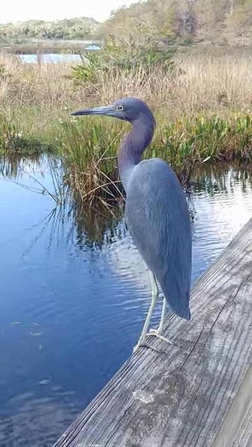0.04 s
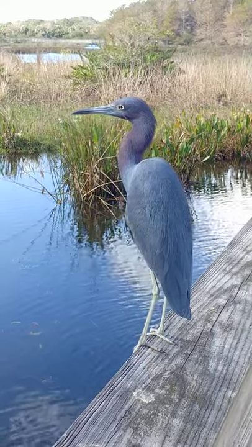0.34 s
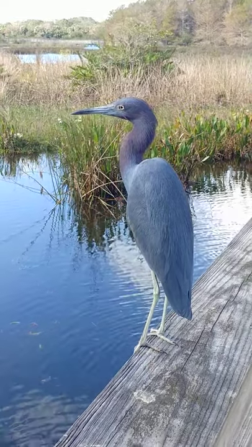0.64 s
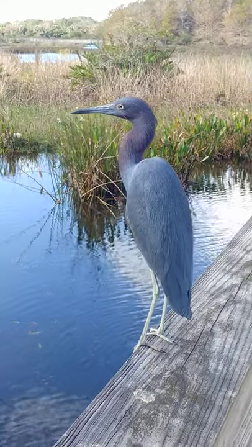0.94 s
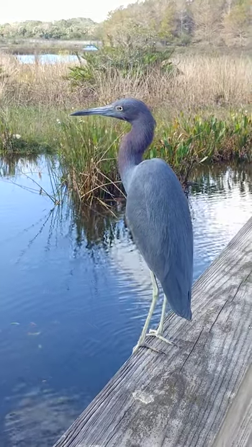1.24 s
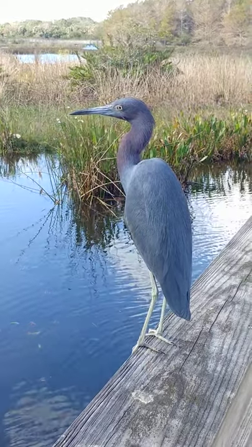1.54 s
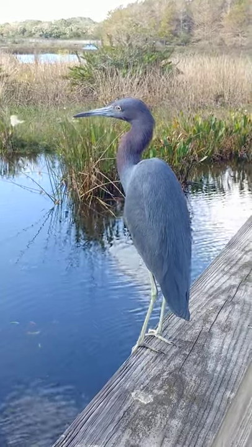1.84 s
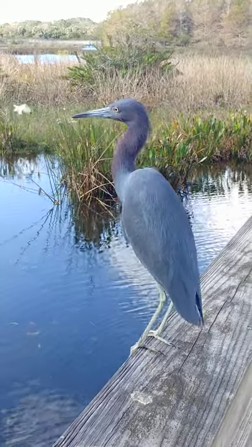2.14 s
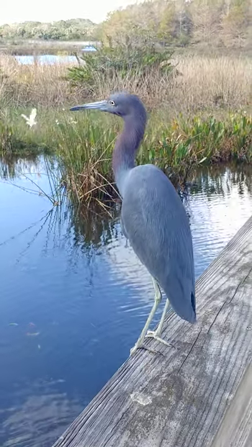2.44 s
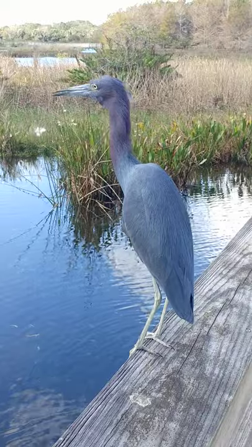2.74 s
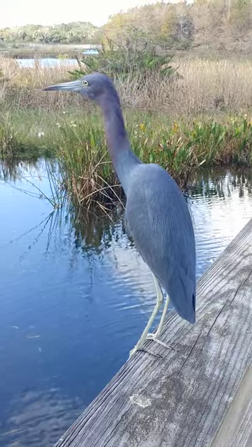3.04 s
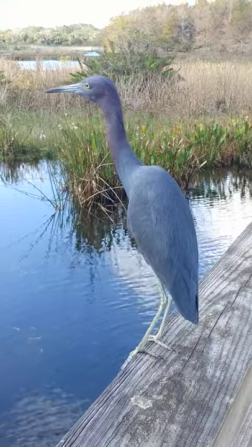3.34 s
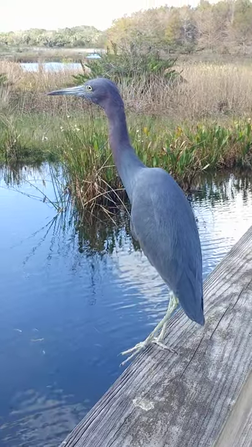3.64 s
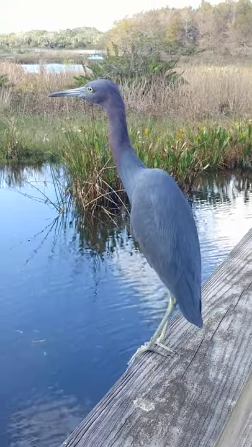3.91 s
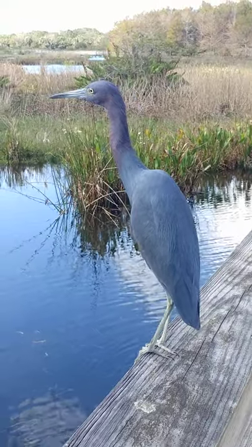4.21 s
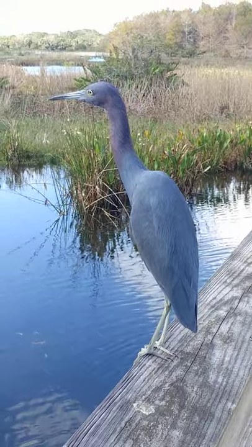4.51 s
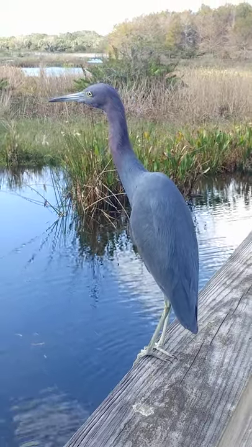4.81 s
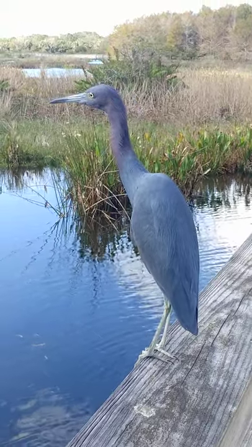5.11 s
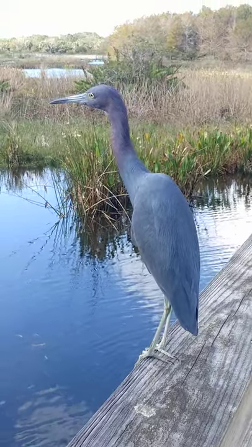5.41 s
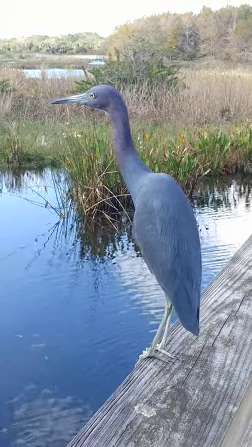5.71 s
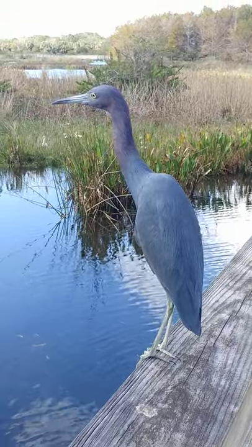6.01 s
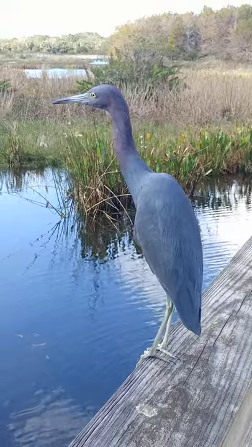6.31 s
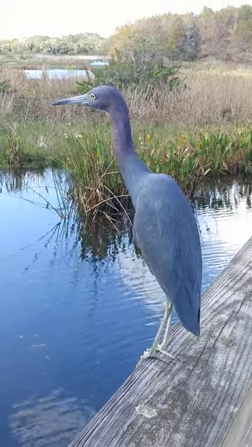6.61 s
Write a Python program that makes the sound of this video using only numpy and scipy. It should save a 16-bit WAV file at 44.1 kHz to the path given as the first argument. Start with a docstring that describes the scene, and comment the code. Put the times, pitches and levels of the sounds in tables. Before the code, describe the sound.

A soft outdoor hush lies over a marsh pond, with one faint, distant water bird hoot at about 0.3 seconds. From 0.7 seconds, low gusts buffet the microphone, shifting between left and right and thumping hardest around 1.4 to 1.7 seconds. Near 1.9 seconds there is a brief, dry, crackly scuff close on the right, followed by a few faint ticks. At about 2.8 seconds a harsh, bird-like squawk starts close on the same side, a quick rasping rattle that runs into a short falling squeal and ends by 3.1 seconds. A small croak follows at 3.4 seconds, among a few very faint, far hoots. The wind picks up again from about 3.8 seconds and keeps rumbling and fluttering unevenly, with stronger gusts near 5.1 and 6 seconds, easing towards the end.

```python
"""A soft outdoor hush and a far hoot, then gusts buffeting both microphone ports, on a boardwalk over a
marsh pond. Close to the right port something rubs, probably the grip on the casing: a brush, a crackly
scuff, then a harsh squawk in which stick-slip jerks run together into a short falling squeal, and one
last small croak. A few more hoots of water birds carry across the marsh, and the gusts go on."""
import sys
import numpy as np
from scipy import signal
from scipy.fft import rfft, irfft, next_fast_len
from scipy.io import wavfile

SR = 44100
rng = np.random.default_rng(int(sys.argv[2]) if len(sys.argv) > 2 else 0)


def to_wav(sig):
    """Store sig (one row per channel, or 1-D mono) as 16-bit WAV at the path in sys.argv[1].

    Samples outside -1..1 are clipped; the rate is SR.
    """
    pcm = np.clip(np.atleast_2d(sig), -1, 1) * 32767
    pcm = np.round(pcm).astype(np.int16)
    wavfile.write(sys.argv[1], SR, pcm.T)  # frames by channels


N = 298116
TIME = np.arange(N) / SR
SLOW_TIME = TIME[::20]

# colour of friction heard through the casing: f/Hz, relative level/dB
RASP_COLOUR = [(200, -2.5), (500, 8.5), (1000, 4), (2200, 17), (2650, 7), (2900, -3.5), (3400, 3.5),
               (4250, 8), (5000, 1), (5400, 5), (6300, -5), (7500, 0), (9600, -13.5), (10100, -33)]


def wind():
    """Wind on the microphone: the hardest gusts are rounded off; eddies smaller than a port cancel."""
    overload, port_hz = .9, 713
    pressure = breeze() + buffets()
    return low_pass(overload * np.tanh(pressure / overload), port_hz)


def breeze():
    """The same gusts pass both ports, each with its own strength at either one."""
    # gusts: t/s, rise/s, fall/s, left level/dB, right level/dB, extra flutter/dB
    gusts = [(0.62, 0.094, 0.4, -37, -36.5, -3), (0.768, 0.031, 0.098, -5.5, -20, -2),
             (1.268, 0.021, 0.023, -37, -20, 17.5), (1.31, 0.16, 0.18, -14, -20, 8),
             (1.424, 0.072, 0.044, -27.5, -6, 0), (1.498, 0.02, 0.083, -4.5, -6, 2),
             (1.6, 0.059, 0.037, -15.5, -2, -4), (1.653, 0.043, 0.06, -14.5, -7, 5.5),
             (1.925, 0.12, 0.12, -18, -15, 2), (2.085, 0.023, 0.0083, -20.5, -16.5, 4),
             (2.196, 0.075, 0.12, -17, -14, -0.5), (2.382, 0.039, 0.035, -23, -10, -8.5),
             (2.643, 0.55, 0.031, -26, -31.5, 2.5), (2.812, 0.11, 0.05, -20, -28, -7),
             (3.415, 0.27, 0.017, -50, -27.5, -12), (3.559, 0.035, 0.014, -42, -28.5, -16),
             (3.803, 0.054, 0.046, -16, -21.5, -7.5), (3.981, 0.064, 0.071, -16.5, -15.5, 3),
             (4.033, 0.035, 0.037, -20, -16, 15), (4.165, 0.075, 0.031, -18, -14.5, 9.5),
             (4.315, 0.015, 0.05, -12, -20, -15), (4.479, 0.13, 0.086, -35.5, -19, 6.5),
             (4.74, 0.42, 0.22, -36, -33, -15), (4.947, 0.074, 0.049, -16.5, -31, 6),
             (5.108, 0.079, 0.056, -10.5, -11.5, -0.5), (5.266, 0.11, 0.18, -20.5, -37, 4.5),
             (5.52, 0.084, 0.11, -45, -19.5, -10), (5.668, 0.093, 0.074, -19, -20.5, 5.5),
             (5.856, 0.067, 0.077, -17, -22, 4), (6.039, 0.12, 0.081, -20, -8.5, -3.5),
             (6.14, 0.034, 0.02, -20, -36, 4), (6.34, 0.14, 0.091, -21.5, -17, -4),
             (6.66, 0.13, 0.068, -29, -37, 3)]
    times, rise_s, fall_s, left_db, right_db, extra_db = np.transpose(gusts)
    shape_db = swells(times, rise_s, fall_s, shape=1.24)
    left = turbulence(shape_db + left_db[:, None], extra_db[:, None] - 15.5, calm_db=-48,
                      calm_flutter_db=-76.5, gain_db=-8.5, lumps_db=4.5, brightening=0.13)
    right = turbulence(shape_db + right_db[:, None], extra_db[:, None] - 9.5, calm_db=-41.5,
                       calm_flutter_db=-48, gain_db=-7, lumps_db=5.5, brightening=0.036)
    return np.array([left, right])


def turbulence(gusts_db, eddies_db, calm_db, calm_flutter_db, gain_db, lumps_db, brightening):
    """Eddies at one port: rumble below, lumpy flutter above that grows faster and brightens in gusts."""
    # colour of the wind: f/Hz, relative level/dB
    wind_colour = [(16, -5.5), (30, -16), (55, -20), (100, -22.5), (180, -20), (300, -29.5), (450, -43),
                   (700, -55.5), (1100, -45.5), (2000, -73)]
    flutter_growth = 1.524   # dB of flutter for each dB of rumble
    rumble_db = summed_db(gusts_db, calm_db)
    flutter_db = summed_db(flutter_growth * gusts_db + eddies_db, calm_flutter_db)
    gusty = 1 - 0.7 * from_db(calm_flutter_db - flutter_db)   # calm air is smoother
    lumps, out = drift(23), 0
    for hz, band in bands(18, 1600, count=12):
        small = np.clip(np.log2(hz / 75) / 1.586, 0, 1)   # share of small eddies
        reach_db = brightening * max(np.log2(hz / 220), 0) * (flutter_db + 30)
        band_db = (1 - small) * rumble_db + small * (flutter_db + lumps_db * gusty * lumps) + reach_db
        steady = evened(band, span_s=0.077) * band.std()
        out += from_db(at_hz(wind_colour, hz) + band_db) * steady
    return from_db(gain_db) * out


def buffets():
    """Single eddies hit a port: a push and a pull of pressure."""
    # the hardest eddies: t/s, side (-1 left, 1 right), peak level/dB, width/ms
    eddies = [(0.76, -1, -24, 0.3), (1.2629, 1, -22, 0.62), (1.403, 1, -8, 2.2), (1.488, 1, -17.5, 1.36),
              (1.611, 1, -5, 1.3), (1.663, 1, -5.5, 4.1), (4.1025, 1, -23.5, 0.68), (4.144, 1, -23, 0.58),
              (4.1711, 1, -24, 0.45), (6.0306, 1, -11, 2.9)]
    out = np.zeros((2, N))
    for s, side, peak_db, width_ms in eddies:
        near = around(s)
        age = (TIME[near] - s) / (width_ms / 1000)
        push_pull = 2 * np.tanh(age) / np.cosh(age)
        out[int(side > 0), near] += rng.choice([-1, 1]) * from_db(peak_db) * push_pull
    return out


def squawk():
    """Stick-slip on the casing, right at the microphone: jerks, a two-voiced squeal, a last croak."""
    # the squeal's two vibrations: t/s, f/Hz, level/dB, roughness (0 = smooth)
    high_voice = [(2.93, 1780, -44, 0.8), (2.965, 1836, -41, 1.2), (2.973, 1803, -46, 0.7),
                  (2.977, 1825, -31.5, 0), (2.989, 1840, -34.5, 0.48), (3.003, 1900, -35, 0.33),
                  (3.02, 1896, -41, 0.47), (3.038, 1790, -47, .6), (3.047, 1730, -69, .4)]
    low_voice = [(2.93, 1340, -63, 1), (2.942, 1350, -50, 0.48), (2.985, 1433, -47.5, 0.41),
                 (3.015, 1356, -54, 0.78), (3.035, 1370, -46, 0.23), (3.053, 1320, -42.5, 0.15),
                 (3.072, 1250, -50.5, 0.4), (3.08, 1235, -57, 0.24)]
    # their harmonics: multiple of the pitch, relative level/dB
    high_harmonics = [(1, 0.5), (2, -21.5)]
    low_harmonics = [(1, 2.5), (2, -12), (3, -20), (4, -20), (5, -46)]
    return (jerks()
            + squeal(high_voice, high_harmonics, jitter=0.066, growl=0.48, rasp_db=-7)
            + squeal(low_voice, low_harmonics, jitter=0.058, growl=0.94, rasp_db=-13))


def jerks():
    """Each slip swings the casing for a few cycles, throws off a spurt of rasp, then drags a little."""
    # runs of jerks: t/s, rate/Hz, peak level/dB, rasp relative to the peak/dB
    rattle = [(2.752, 70, -45, -13), (2.766, 70, -35, -13), (2.803, 66, -34, -7), (2.823, 82, -23, -7),
              (2.858, 83, -20.5, -6), (2.873, 83, -27, -7), (2.88, 83, -31, -8)]
    run_up = [(2.923, 130, -37, -11), (2.936, 130, -29, -15), (2.955, 110, -30.5, -13),
              (2.974, 110, -34, -13)]
    croak = [(3.349, 85, -47, -10), (3.361, 80, -38, -14), (3.374, 82, -41, -11), (3.386, 82, -32, -11),
             (3.392, 82, -42, -11)]
    # resonances of the casing: f/Hz, share by which the pitch wavers, relative level/dB
    casing = [(1336, 0.0518, -10), (1662, 0.061, -2.5), (1900, 0.059, -28)]
    times, peak_db, rasp_db = np.hstack([slips(run) for run in (rattle, run_up, croak)])
    swing = rms_one(sum(from_db(db) * np.sin(shaky_phase(hz, waver)) for hz, waver, db in casing))
    ring = swing * bursts(times, peak_db, rise_s=.002, fall_s=.0022)
    ring = signal.sosfilt(signal.butter(2, [1150, 2400], "band", fs=SR, output="sos"), ring)
    spurt = bursts(times, peak_db + rasp_db - 0.5, rise_s=.0011, fall_s=.0018)
    drag = bursts(times, peak_db + rasp_db - 14.5, rise_s=0.011, fall_s=0.018)
    hard = np.clip(spurt / from_db(-50), 0, 1)   # hard slips keep all their treble
    return ring + friction(spurt * hard, RASP_COLOUR) + soft_rasp(spurt * (1 - hard) + drag)


def slips(run):
    """Slightly uneven jerks, each with a weaker rebound: t/s, peak level/dB, relative rasp/dB."""
    jitter_s, spread_db = 0.00039, 1.5
    rebound_s, rebound_loss_db = 0.0052, 6.5
    rate_hz, level_db, rasp_db = in_time(run)
    count = np.ceil(np.cumsum(rate_hz * sounding(run)) / SR)
    onsets = TIME[np.diff(count, prepend=0) > 0]
    chance = rng.standard_normal((len(onsets), 4))
    times = np.r_[onsets, onsets + rebound_s] + jitter_s * chance[:, :2].T.ravel()
    change_db = spread_db * chance[:, 2:].T.ravel() - np.repeat([0, rebound_loss_db], len(onsets))
    return times, np.interp(times, TIME, level_db) + change_db, np.interp(times, TIME, rasp_db)


def squeal(curve, harmonics, jitter, growl, rasp_db):
    """Slips lock into a tone; while it is hoarse its pitch shakes and every fourth cycle is stronger."""
    hz, level_db, rough = in_time(curve)
    phase = shaky_phase(hz, jitter * rough)
    edge = np.clip(from_db(level_db + 45.5), 0, 1)   # overtones fade before the fundamental
    tone = np.sqrt(2) * sum(from_db(db) * edge ** (k > 1) * np.sin(k * phase) for k, db in harmonics)
    uneven = np.cos(phase / 4) + .7 * drift(300)
    level = sounding(curve) * from_db(level_db)
    rasp = soft_rasp(level * from_db(rasp_db) * rough * (1 + np.cos(phase)))
    return level * tone * (1 + growl * rough * uneven) + rasp


def scuff():
    """Grainy strokes of dry rubbing beside the port, with a few sharp snags."""
    # strokes: t/s, rise/s, fall/s, peak level/dB
    strokes = [(1.27, 0.021, .05, -58), (1.775, 0.019, .03, -66), (1.909, 0.011, 0.026, -41),
               (1.943, 0.029, 0.023, -40.5), (1.975, 0.037, .045, -59), (2.051, 0.004, .007, -58.5),
               (2.17, .1, .1, -71.5), (2.346, .006, .015, -66), (2.466, .003, .009, -61.5)]
    # snags: t/s, relative peak level/dB
    snags = [(1.9073, -37), (1.9183, -42), (1.9342, -33), (1.9384, -25), (1.9439, -29), (1.954, -41)]
    # colour of the rubbing: f/Hz, relative level/dB
    rub_colour = [(400, -5.5), (700, 5), (1500, 3), (2300, 9), (2900, -1), (3600, 10.5), (4600, 5),
                  (5600, 3), (6800, 10), (7900, 4.5), (9300, 2.5), (10800, -20.5), (13500, -10),
                  (15500, -30)]
    times, rise_s, fall_s, stroke_db = np.transpose(strokes)
    level_db = summed_db(swells(times, rise_s, fall_s, shape=1.3) + stroke_db[:, None], floor_db=-100)
    grainy = from_db(level_db + 2.5 * drift(200))
    snag_times, snag_db = np.transpose(snags)
    catches = bursts(snag_times, snag_db - 2.5, rise_s=0.0004, fall_s=0.00069)
    return friction(grainy + catches, rub_colour)


def friction(strength, spectrum):
    """Tiny impacts of the given strength, coloured by the casing they pass through."""
    impacts = rng.choice([-1., 1.], N)
    return shaped(strength * impacts, spectrum) / shaped(impacts, spectrum).std()


def soft_rasp(strength):
    """Gentle slips make a duller rasp."""
    return low_pass(friction(strength, RASP_COLOUR), hz=6200)


def hoots():
    """Water birds far across the marsh: soft, nearly pure calls that glide a little."""
    # calls: t/s, length/s, start f/Hz, end f/Hz, level/dB
    calls = [(0.333, 0.14, 630, 574, -53.5), (3.215, 0.095, 574, 595, -50.5), (3.34, 0.044, 500, 496, -54),
             (3.412, 0.041, 600, 580, -51)]
    out, unsteady = np.zeros(N), 1 + 0.0069 * drift(40)
    for s, length_s, start_hz, end_hz, db in calls:
        along = np.clip((TIME - s) / length_s, 0, 1)
        hz = (start_hz + (end_hz - start_hz) * along) * unsteady
        out += from_db(db) * np.sin(np.pi * along) * np.sin(2 * np.pi * np.cumsum(hz) / SR)
    return out


def hush():
    """Marsh ambience: distant noise at both ports, rustling reeds and a faint far drone on the right."""
    # colours of the hush at each port, the reeds and the drone: f/Hz, relative level/dB
    left_colour = [(60, -63), (150, -94), (300, -99), (600, -106), (1200, -113), (3000, -116), (7000, -118),
                   (10500, -120), (15000, -117.5)]
    right_colour = [(100, -67), (220, -107.5), (340, -84.5), (470, -86), (900, -85.5), (1400, -91),
                    (1900, -98), (2600, -110), (3300, -110), (3750, -104), (4600, -109), (7500, -111),
                    (10500, -121), (14000, -116)]
    reeds_colour = [(700, -105), (1500, -94), (1900, -99), (2700, -115), (3900, -105), (5500, -108),
                    (8000, -110), (10000, -124), (15000, -130)]
    drone_colour = [(280, -27.5), (320, -7), (343, -3.5), (380, -18.5), (600, -73.5)]
    # slow rise and fall of the right-hand hush, the reeds and the drone: t/s, level/dB
    swell = [(0, 1.5), (.3, -0.5), (1.2, -1.5), (3, -2.5), (3.6, .5), (4.6, 0.5), (5.6, -2.5), (5.9, 1.5),
             (6.76, -2)]
    reeds = [(0, -23), (1.2, -5), (2.2, -1.5), (3.2, -4.5), (4, -7.5), (4.8, -1), (5.6, -1), (6.2, -15.5),
             (6.76, -3.5)]
    drone = [(0, -57), (.9, -62), (1.5, -79.5), (5.6, -81.5), (6.2, -63), (6.76, -55.5)]
    (swell_db,), (reeds_db,), (drone_db,) = in_time(swell), in_time(reeds), in_time(drone)
    right = coloured(right_colour) * from_db(swell_db + .5 * drift(1.7))
    right += from_db(reeds_db) * coloured(reeds_colour)
    right += from_db(drone_db) * rms_one(coloured(drone_colour))
    return np.array([coloured(left_colour), right])


def on_right(x, left_db):
    """A sound at the right port, of which little reaches the left."""
    return np.array([from_db(left_db) * x, x])


def from_db(db):
    """Decibels to gain."""
    return 10 ** (np.asarray(db) / 20)


def rms_one(x):
    """Scale to unit power."""
    return x / np.sqrt(np.mean(x ** 2) + 1e-20)


def in_time(rows):
    """Each column of a curve at every sample."""
    times, *columns = np.transpose(rows)
    return [np.interp(TIME, times, column) for column in columns]


def sounding(rows):
    """1 between a curve's first and last point, else 0."""
    return (TIME > rows[0][0]) & (TIME < rows[-1][0])


def around(s):
    """The samples within 50 ms of a moment."""
    return slice(int(s * SR) - SR // 20, int(s * SR) + SR // 20)


def bursts(times, peaks_db, rise_s, fall_s):
    """Envelope of short bursts that swell to their peak and die away."""
    power = np.zeros(N)
    for s, peak_db in zip(times, peaks_db):
        near = around(s)
        age = TIME[near] - s
        power[near] += (from_db(peak_db) * np.exp(np.minimum(age / rise_s, -age / fall_s))) ** 2
    return np.sqrt(power)


def swells(times, rises_s, falls_s, shape):
    """One row of dB below the peak for each swell; shape 1 is pointed, 2 is bell-shaped."""
    age = SLOW_TIME - times[:, None]
    from_peak = np.maximum(-age / rises_s[:, None], age / falls_s[:, None])
    return -20 / np.log(10) * from_peak.clip(0, 20) ** shape


def summed_db(rows_db, floor_db):
    """Level of several swells together, over a floor, at every sample."""
    power = np.sum(from_db(np.maximum(rows_db, -200)) ** 2, axis=0) + from_db(floor_db) ** 2
    return np.interp(TIME, SLOW_TIME, 10 * np.log10(power))


def drift(rate_hz):
    """Smooth random wander with spread 1."""
    hop, settle = 40, 2000
    pole = np.exp(-2 * np.pi * rate_hz * hop / SR)
    white = rng.standard_normal(N // hop + settle + 2)
    slow = signal.lfilter([1], [1, -2 * pole, pole * pole], white)[settle:]
    return np.interp(np.arange(N) / hop, np.arange(len(slow)), rms_one(slow))


def shaky_phase(hz, waver):
    """Phase of a vibration whose pitch shakes by the given share."""
    return 2 * np.pi * np.cumsum(hz * (1 + waver * drift(204))) / SR


def at_hz(spectrum, hz):
    """Read a spectrum on a log-frequency axis."""
    points_hz, points_db = np.transpose(spectrum)
    return np.interp(np.log(hz), np.log(points_hz), points_db)


def shaped(x, spectrum):
    """Give a sound the colour of a spectrum, falling away below its first point."""
    size = next_fast_len(N, True)
    hz = np.maximum(np.arange(size // 2 + 1) * SR / size, 1)
    gain = from_db(at_hz(spectrum, hz)) * np.minimum(hz / spectrum[0][0], 1) ** 2
    return irfft(rfft(x, size) * gain, size)[:N]


def coloured(spectrum):
    """Steady noise with the given dB per Hz."""
    return shaped(rng.standard_normal(N), spectrum) * np.sqrt(SR / 2)


def bands(low_hz, high_hz, count):
    """Split a white noise of unit power per Hz into overlapping bands: centre f/Hz, noise."""
    size = next_fast_len(N, True)
    white = rfft(rng.standard_normal(size)) * np.sqrt(SR / 2)
    log_hz = np.log(np.maximum(np.arange(size // 2 + 1) * SR / size, 1))
    centres, step = np.linspace(np.log(low_hz), np.log(high_hz), count, retstep=True)
    for centre in centres:
        triangle = np.maximum(1 - np.abs(log_hz - centre) / step, 0)
        yield np.exp(centre), irfft(white * triangle, size)[:N]


def evened(x, span_s):
    """Hold a noise at unit power over the given span."""
    window = np.hanning(2 * int(span_s * SR))
    power = signal.fftconvolve(x * x, window / window.sum(), "same")
    return x / np.sqrt(np.abs(power) + 1e-12)


def low_pass(x, hz):
    """Fourth-order roll-off."""
    return signal.sosfilt(signal.butter(4, hz, fs=SR, output="sos"), x)


def scene():
    """From the boardwalk: wind on both ports, rubbing close to the right one, hush and birds far off."""
    rubbing = on_right(squawk() + scuff(), left_db=-44)
    return wind() + rubbing + hush() + on_right(hoots(), left_db=-31)


def record(dry):
    """The recorder cuts the top treble steeply."""
    cutoff_hz = 15700
    return signal.sosfilt(signal.ellip(12, .1, 80, cutoff_hz, fs=SR, output="sos"), dry)


dry = scene()
out = record(dry)
to_wav(out)
```